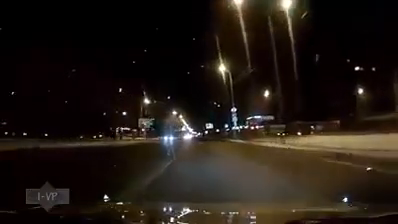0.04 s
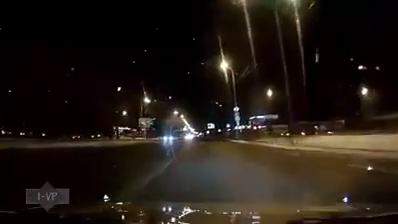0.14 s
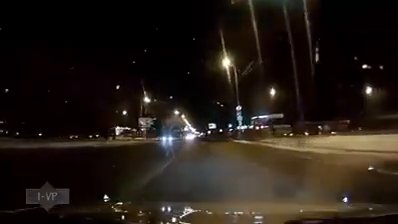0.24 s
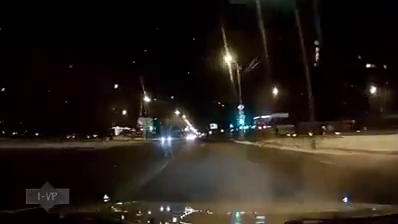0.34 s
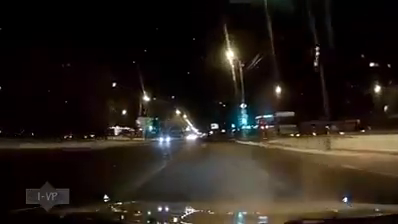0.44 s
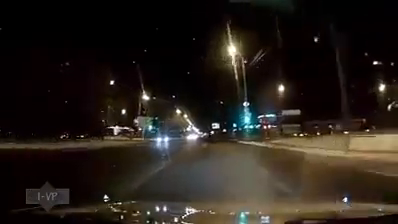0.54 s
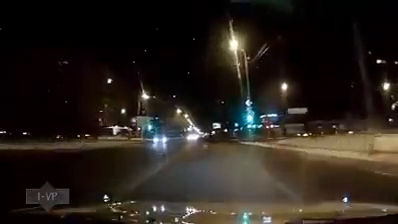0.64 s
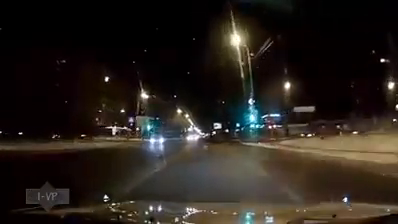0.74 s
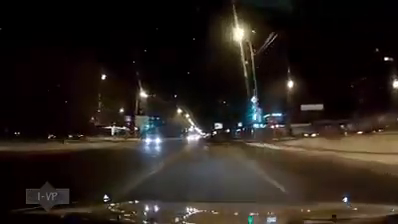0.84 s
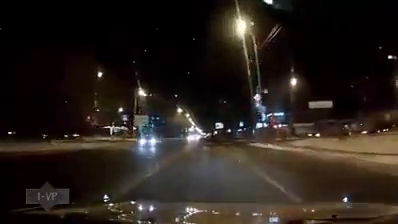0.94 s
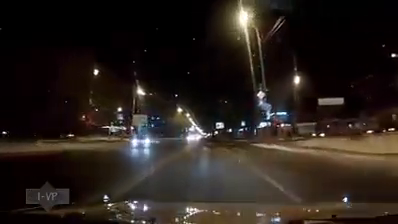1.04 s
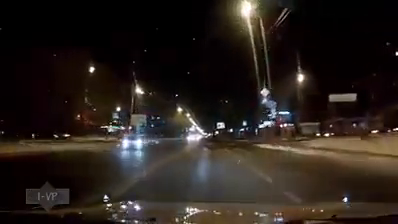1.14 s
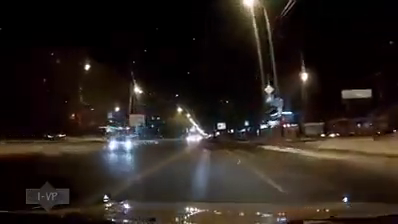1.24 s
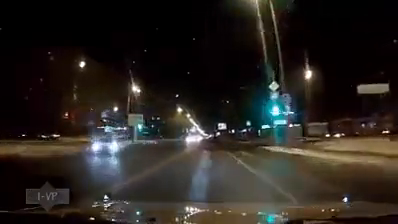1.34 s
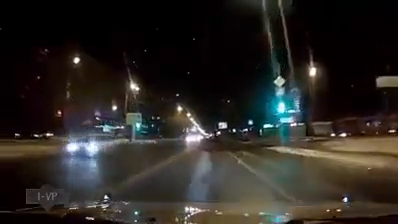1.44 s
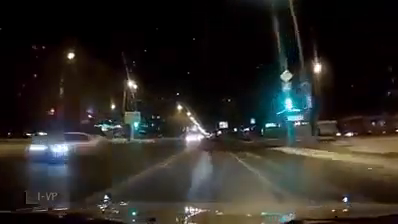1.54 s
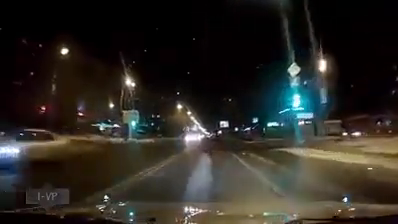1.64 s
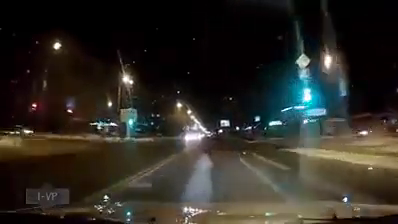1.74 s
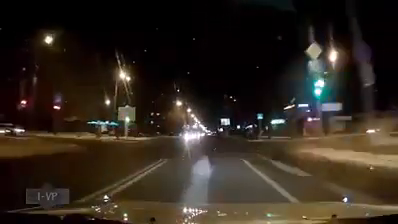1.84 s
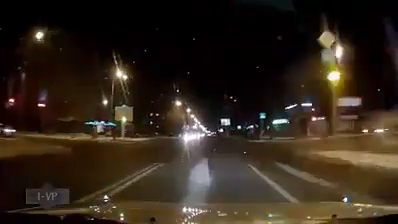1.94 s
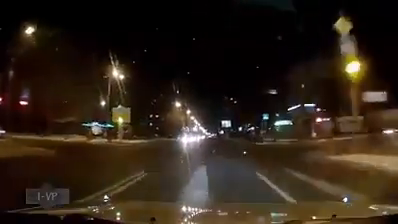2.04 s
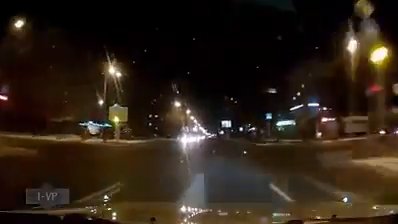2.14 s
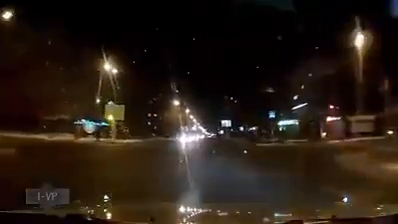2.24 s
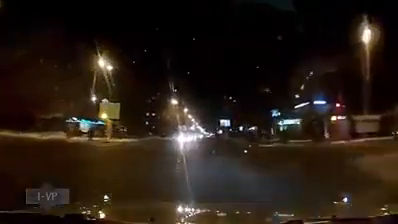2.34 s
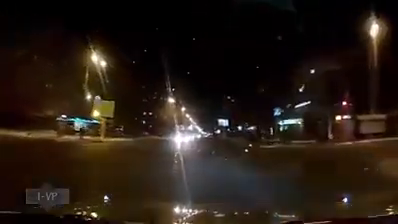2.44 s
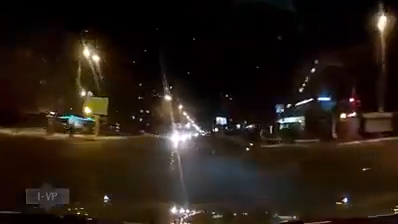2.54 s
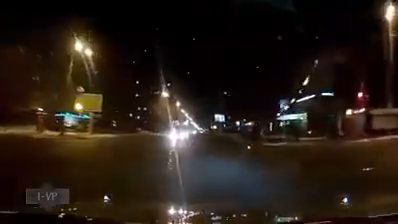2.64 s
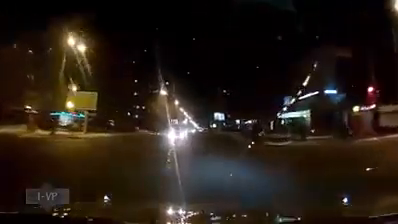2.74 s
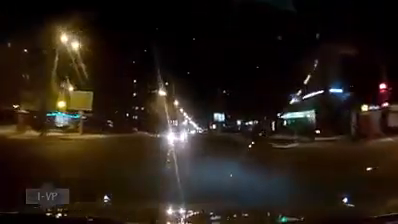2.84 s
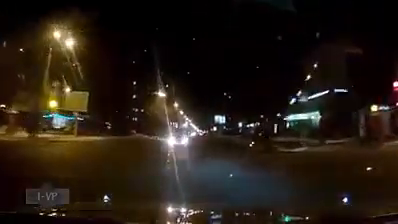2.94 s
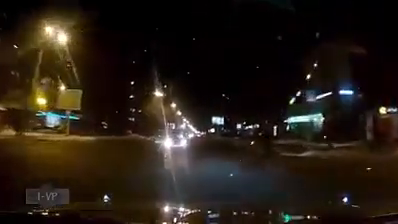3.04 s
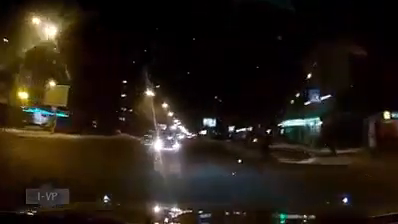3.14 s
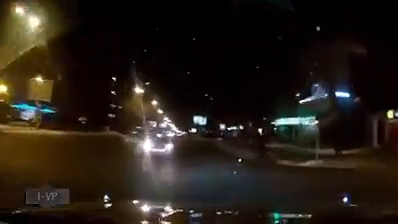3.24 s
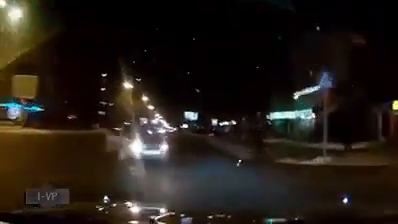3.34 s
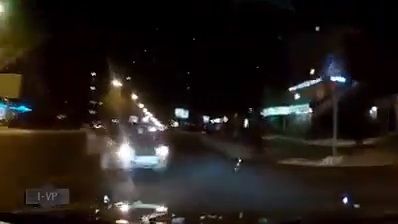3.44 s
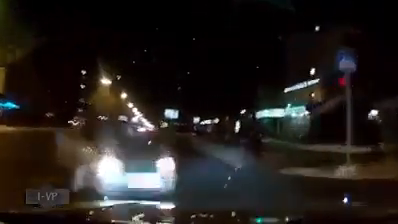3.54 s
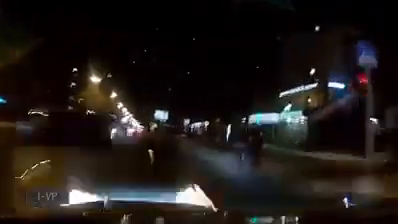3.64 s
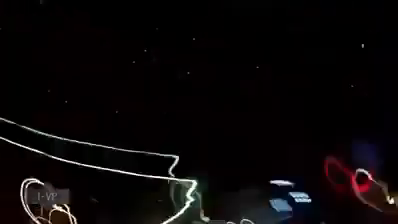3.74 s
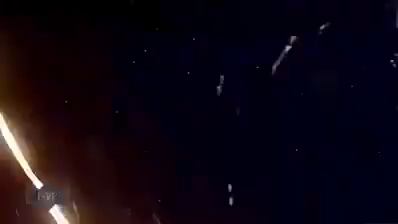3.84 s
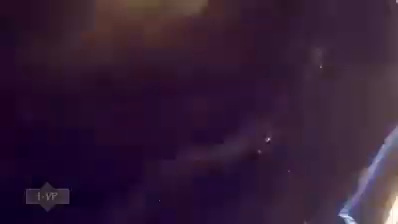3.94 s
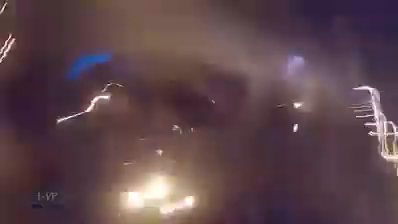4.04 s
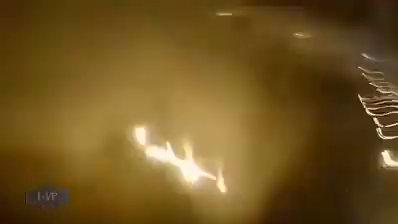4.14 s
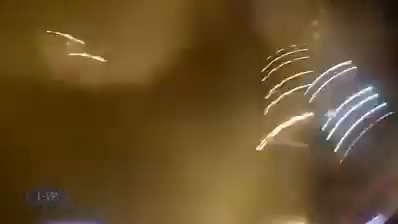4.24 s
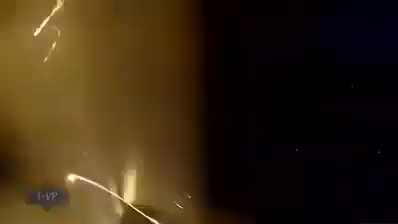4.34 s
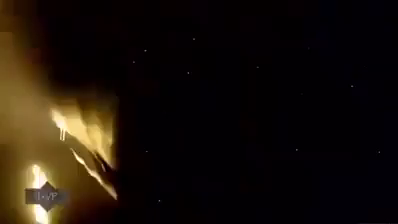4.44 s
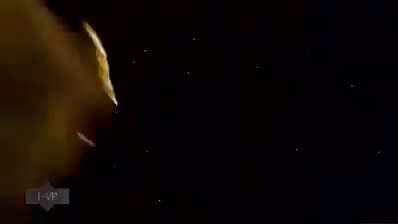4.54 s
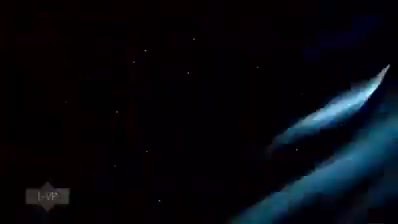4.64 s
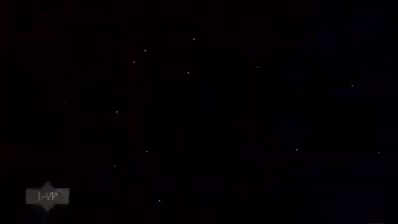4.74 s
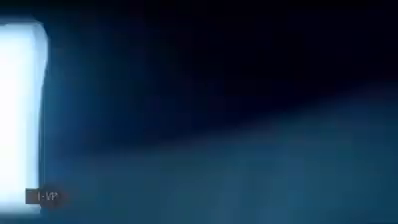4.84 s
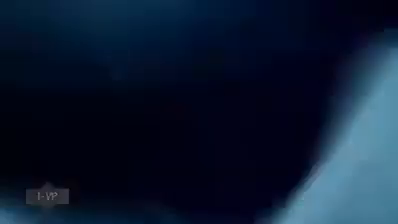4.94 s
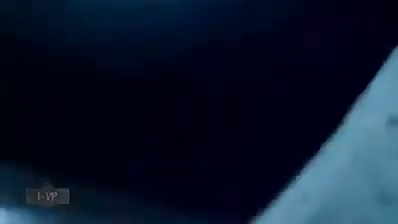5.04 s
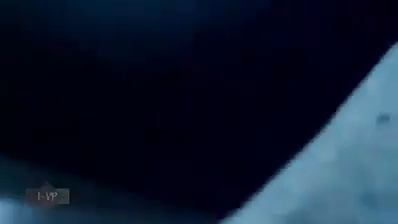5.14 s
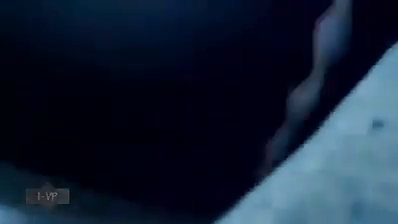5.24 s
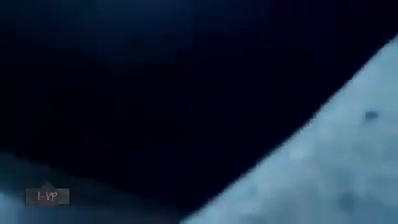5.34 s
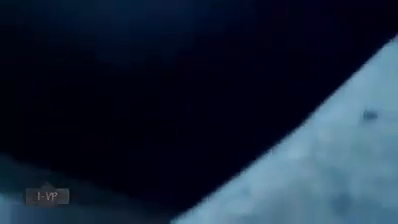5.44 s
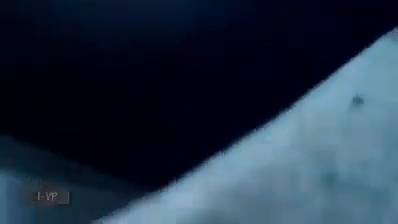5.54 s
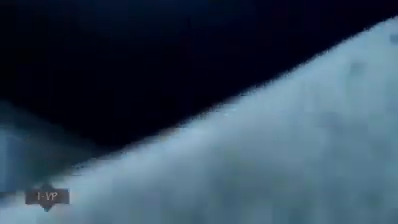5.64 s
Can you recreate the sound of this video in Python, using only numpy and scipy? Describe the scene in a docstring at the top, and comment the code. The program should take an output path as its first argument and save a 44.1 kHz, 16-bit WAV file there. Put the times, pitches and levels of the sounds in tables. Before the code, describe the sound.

Inside a car, a low road rumble and slushy swishes end in a loud collision with bangs, crumpling metal and scattered knocks.

```python
"""A low tyre roar comes first: a car rolls over a wet winter road, heard by a small camera on the
windscreen. The tyres swish twice in slush as it brakes, then it hits another car. Sheet metal crumples
in dense clicks, the camera falls and knocks about the cabin, the blows excite the resonances of trim
and panels, and the wreck hisses. The microphone saturates on the loudest swings."""
import sys
import numpy as np
from scipy import signal
from scipy.fft import rfft, irfft, next_fast_len
from scipy.io import wavfile
from scipy.ndimage import uniform_filter1d

SR = 44100
rng = np.random.default_rng(int(sys.argv[2]) if len(sys.argv) > 2 else 0)


def file_out(sig):
    """Save sig as 16-bit WAV at sys.argv[1]."""
    # one column per channel
    cols = np.atleast_2d(sig).T
    # limit, then scale
    lim = np.clip(cols, -1, 1)
    pcm = np.round(lim * 32767).astype(np.int16)
    wavfile.write(sys.argv[1], SR, pcm)


N = 250929


def blows():
    """Impact excitation: a brief rattle of contacts drives the modes of trim and sheet, and ticks."""
    # blows: (time [s], weight [dB], crack [dB], tick [dB], rattle length [s])
    impacts = [(3.7, -24, -67, -75, 0.005), (3.707, -8.5, -44, -50, 0.0058), (3.73, -17, -25.5, -40, 0.016),
               (3.749, -16, -24.5, -44, 0.014), (3.764, -26.5, -23.5, -34, 0.027),
               (3.781, -16.5, -38, -37, 0.009), (3.797, -41, -21.5, -23.5, 0.013),
               (3.819, -24, -23.5, -28, 0.013), (3.843, -36, -21.5, -22.5, 0.0065),
               (3.902, -9.5, -25, -30.5, 0.0042), (3.923, -19, -20, -36, 0.0036),
               (3.933, -8, -16.5, -26, 0.0086), (3.953, -14, -18, -26, 0.01), (3.99, -6, -21, -28, 0.0031),
               (4.02, -17.5, -23.5, -32, 0.014), (4.088, -30, -26.5, -41, 0.0025),
               (4.101, -16, -46, -56, 0.008), (4.176, -17, -31.5, -45, 0.012),
               (4.299, -38, -31.5, -43, 0.011), (4.392, -7, -27.5, -27, 0.0074),
               (4.469, -20.5, -62, -68, 0.0077), (4.496, -15, -24.5, -29.5, 0.015),
               (4.531, -28, -30, -56, 0.0056), (4.546, -17.5, -56, -69, 0.0062),
               (4.57, -17.5, -69, -67, 0.0057), (4.65, -49, -33.5, -34.5, 0.0068),
               (4.7767, -4, -17.5, -21, 0.0028), (4.785, -4.5, -26, -25.5, 0.005),
               (4.838, -29.5, -28.5, -39.5, 0.0036), (4.876, -28.5, -21.5, -43, 0.0018),
               (4.917, -32, -24.5, -49, 0.0046), (4.947, -35, -32, -43, 0.008),
               (5.051, -22.5, -29.5, -48, 0.0021), (5.397, -40, -34.5, -40, 0.0098),
               (5.428, -22.5, -39, -57, 0.005)]
    # modes of the struck trim: (frequency [Hz], bandwidth [Hz], gain [dB])
    trim = [(201, 208, -0.5), (342, 490, -1), (1144, 1060, 10.5), (2340, 1500, 2), (3100, 1050, -0.5)]
    # mode of a hollow panel: (frequency [Hz], bandwidth [Hz], gain [dB])
    hollow_panel = [(177.8, 18, 11.5)]
    # modes of the bent sheet metal: (frequency [Hz], bandwidth [Hz], gain [dB])
    sheet_modes = [(1273.5, 78, 0), (1457, 120, 1.5), (2122, 29, 4), (2627, 42, 0), (3630, 20, 1)]
    retune, scatter_db, knock_offset_db = 0.06, 3.5, -4
    contacts = undb(1.34 * walk(500)) * rng.standard_normal((4, N))
    chance = rng.standard_normal((len(impacts), 2, len(sheet_modes)))
    t = np.arange(int(.2 * SR)) / SR
    out = np.zeros(N)
    for (start, weight_db, crack_db, tick_db, length), (favour, bend) in zip(impacts, chance):
        # each blow lands elsewhere, retuning the sheet and favouring other modes
        sheet = [(hz * np.exp(retune * b), width, db + scatter_db * a)
                 for (hz, width, db), a, b in zip(sheet_modes, favour, bend)]
        settling = np.exp(-np.maximum(t - length, 0) / (0.96 * length))
        first_contact = 1 + 1.28 * np.exp(-t / 0.00082)  # the hardest of the rattle
        envelope = np.minimum(t / 0.00059, 1) * settling * first_contact
        span = slice(int(start * SR), int(start * SR) + len(t))
        force = envelope * contacts[:, span]
        thump = resonances(resonances(force[0], trim[:2]), trim[:2]) + resonances(force[0], hollow_panel)
        knock = resonances(resonances(force[1], trim[2:3]), trim[2:3])
        crack = resonances(resonances(force[2], trim[3:]), trim[3:]) + 5.2 * resonances(force[2], sheet)
        tick = band(force[3], 5200, 8240)
        knock_db = (weight_db + crack_db) / 2 + knock_offset_db
        for db, ring in (weight_db, thump), (knock_db, knock), (crack_db, crack), (tick_db, tick):
            out[span] += undb(db) * ring * np.sqrt(np.sum(envelope ** 2) / np.sum(ring ** 2))
    return out


def wreck():
    """Buckling and friction: metal and debris emit bursts of clicks; the lurching body thuds."""
    # spectrum of crumpling metal: (frequency [Hz], relative density [dB])
    crunch_spectrum = [(260, -13), (450, -1.5), (630, -5), (705, -10.5), (850, -1), (933, -5), (1010, -2.5),
                       (1560, -5.5), (1860, -15), (2080, -14), (2760, -10), (3550, -12.5), (4000, -32.5),
                       (5460, -37), (9240, -120)]
    # metal gives way: (start [s], hold [s], crunch [dB], splinter [dB])
    crushes = [(3.715, 0.045, -24, -41), (3.785, 0.079, -23.5, -32), (3.91, 0.13, -24.5, -35.5),
               (4.05, 0.24, -34.5, -45.5), (4.49, 0.037, -46, -43.5), (4.66, 0.32, -38.5, -48.5)]
    # the body lurches: (start [s], hold [s], jolt [dB], thud [dB])
    lurches = [(3.705, 0.06, -14.5, -22), (3.88, 0.15, -24.5, -21), (4.08, 0.095, -28, -26),
               (4.42, 0.07, -15.5, -24), (4.5, 0.064, -17.5, -38), (4.85, 0.021, -15, -27.5),
               (5.06, 0.0069, -26, -35.5), (5.30, 0.036, -34.5, -34), (5.53, 0.11, -28.5, -34)]
    slide = (crushes[0][0], N / SR, -36.5, -56)  # debris slides on from the first crush
    bursts = undb(1.8 * walk(70))
    crunch = coloured(grit(1500, scatter_db=3.0), crunch_spectrum, flicker_db=1.6, flicker_hz=30)
    splinter = unit(band(grit(2400, scatter_db=0.94), 3600, 7800))
    jolt = band_noise(42, 101.5)
    thud = band_noise(93, 348) * undb(3.74 * walk(24.935))
    crunch_gain, splinter_gain = surges(crushes + [slide], fade_db_s=103.5)
    jolt_gain, thud_gain = surges(lurches, fade_db_s=58.5)
    low = jolt_gain * jolt + thud_gain * thud
    return low + bursts * (crunch_gain * crunch + splinter_gain * splinter)


def heave():
    """Mass on a spring: the body heaves on its tyres with a very low, wavering tone."""
    # course of the heave: (time [s], frequency [Hz], level [dB])
    course = [(2.4, 27, -48), (2.52, 25, -25), (2.66, 30.4, -57), (2.82, 37.2, -16), (2.97, 32, -36),
              (3.11, 31.8, -27), (3.21, 33, -16), (3.43, 29, -15), (3.57, 36.8, -20.5), (3.68, 32.2, -31.5),
              (3.76, 29.94, -14), (3.82, 25.3, -29), (3.885, 26.2, -11), (3.98, 27.7, -30),
              (4.03, 27, -10.5), (4.27, 26.2, -26.5), (4.4, 31.6, -27), (4.65, 25.9, -8.5),
              (4.81, 27.5, -31), (4.87, 24, -12), (4.99, 23.7, -13), (5.08, 24.2, -20), (5.2, 19, -22.5),
              (5.69, 24, -33)]
    return tone(course, second_db=-13.5, rough_db=3.23, waver=0.161)


def panels():
    """Plate resonance: panels hum on in the crash, each with a drifting pitch."""
    # one course for each panel: (time [s], frequency [Hz], level [dB])
    courses = [
        [(4.16, 175.6, -32), (4.2, 165, -18.5), (4.25, 176.5, -22.5), (4.376, 196.7, -27), (4.4, 232, -10.5),
         (4.42, 217, -31)],
        [(4.79, 179, -24.5), (4.84, 195, -30.5), (4.91, 217.8, -24), (5.02, 200.8, -32)],
        [(5.29, 112.3, -28.5), (5.34, 110.9, -33.5), (5.518, 98.07, -29.5), (5.55, 99.2, -37)],
    ]
    return sum(tone(course, second_db=-13, rough_db=3.46, waver=0.05) for course in courses)


def pings():
    """Damped vibration: one thin mode of a small stiff metal part, struck again before it has died."""
    # strikes on the part: (time [s], level [dB])
    strikes = [(4.393, -50), (4.497, -50), (4.65, -60)]
    mode_hz, t60_s = 4310, 1
    t = np.arange(N) / SR
    envelope = sum((t >= start) * undb(db - 60 * np.abs(t - start) / t60_s) for start, db in strikes)
    return envelope * undb(2.5 * walk(19)) * np.sin(2 * np.pi * mode_hz * t)


def slush():
    """Random impacts sum to noise: slush swishes in the wheel arches, drums on the floor and sprays."""
    # patches of slush: (middle [s], length [s], swish [dB], drumming [dB], spray [dB])
    patches = [(2.82, 0.47, -42.5, -60, -71), (3.3, 0.2, -54, -32.5, -63), (3.466, 0.36, -47, -43, -84.5),
               (3.4, 1, -57.5, -48.5, -64.5)]
    # spectrum of the swish: (frequency [Hz], relative density [dB])
    swish_spectrum = [(260, -36), (450, -30.5), (543, -1), (593, -6.5), (848, -1.5), (1150, 3.5),
                      (1730, -13.5), (3090, -21), (3800, -38), (4940, -70), (8360, -120)]
    edge_db = 34  # fall from the middle of a patch to its ends
    swish = coloured(rng.standard_normal(N), swish_spectrum, flicker_db=1.2, flicker_hz=25)
    drum = band_noise(55, 270)
    spray = band_noise(2300, 3700)
    spray = undb(1.1 * walk(30)) * unit(spray + 0.33 * band_noise(3600, 8200))
    t = np.arange(N) / SR
    out = 0
    for middle, length, swish_db, drum_db, spray_db in patches:
        off_centre = np.abs(2 * (t - middle) / length)
        envelope = undb(-edge_db * np.minimum(off_centre ** 2.77, 10))
        out += envelope * (undb(swish_db) * swish + undb(drum_db) * drum + undb(spray_db) * spray)
    return out


def road():
    """Structure-borne sound: tyre roar and body boom reach the cabin through the floor."""
    # spectrum of the road noise: (frequency [Hz], relative density [dB])
    spectrum = [(11, -42), (19, 4), (33, 1), (48, -16), (102, -18), (170, -24), (230, -27.5), (334, -32),
                (359, -28.5), (422, -42.5), (453, -37), (811, -45.5), (1180, -44), (1600, -51.5),
                (2000, -58), (3300, -65), (5000, -86.5), (6500, -91), (9000, -99)]
    level_db = -28 + .7 * walk(3)
    return undb(level_db) * coloured(rng.standard_normal(N), spectrum, flicker_db=1.8, flicker_hz=12)


def rustles():
    """Amplitude-modulated noise: short, grainy treble scuffs over a faint flickering bed."""
    # rustles in the cabin: (start [s], hold [s], level [dB])
    scuffs = [(1.0, 0.13, -84), (2.585, .012, -74), (2.78, 0.088, -80), (3.083, .09, -73),
              (3.275, 0.035, -70), (3.46, .045, -66.5)]
    grain = unit(band(grit(900, scatter_db=2.5), 5600, 8300))
    bed = undb(-89.5 + 1.7 * walk(7.9))
    envelope = surges(scuffs, fade_db_s=248)[0] + bed
    return envelope * undb(1.8 * walk(60)) * grain


def tone(course, second_db, rough_db, waver):
    """Random modulation of pitch and level: a rough near-sine with a weak, broken second partial."""
    times, pitches, levels = np.transpose(course)
    t = np.arange(N) / SR
    hz, db = np.interp(t, times, pitches), np.interp(t, times, levels)
    gate = uniform_filter1d(1. * ((t >= times[0]) & (t <= times[-1])), size=300)
    phase = 2 * np.pi * np.cumsum(hz * np.exp(waver * walk(22))) / SR
    overtone = undb(second_db + 2 * rough_db * walk(60)) * np.sin(2 * phase)
    return gate * undb(db + rough_db * walk(55)) * np.sqrt(2) * (np.sin(phase) + overtone)


def surges(rows, fade_db_s, rise_s=0.015):
    """Incoherent addition: rows rise, hold and fade, and their powers sum to one gain a level column."""
    t = np.arange(N) / SR
    power = 0
    for start, hold, *levels_db in rows:
        envelope = np.clip((t - start) / rise_s, 0, 1) * undb(-fade_db_s * np.maximum(t - start - hold, 0))
        power += (undb(levels_db)[:, None] * envelope) ** 2
    return np.sqrt(power)


def coloured(x, spectrum, flicker_db, flicker_hz):
    """Spectral shaping: x takes on a spectrum in which each half-octave band flickers on its own."""
    hz, db = np.transpose(spectrum)
    size = next_fast_len(N)
    octaves = np.log2(np.maximum(np.fft.rfftfreq(size, 1 / SR), 1))
    shaped = rfft(x, size) * undb(np.interp(octaves, np.log2(hz), db, left=-120, right=-120))
    out = 0
    for centre in np.arange(np.log2(hz[0]) - .5, np.log2(hz[-1]) + 1, .5):
        share = np.clip(1 - np.abs(octaves - centre) * 2, 0, 1)
        out += undb(flicker_db * walk(flicker_hz)) * irfft(shaped * share, size)[:N]
    return unit(out)


def grit(clicks_per_s, scatter_db):
    """Shot noise: random clicks of unequal size over a bed of white noise."""
    arrivals = rng.random(N) < clicks_per_s / SR
    sizes = undb(scatter_db * rng.exponential(size=N)) * rng.standard_normal(N)
    return unit(arrivals * sizes) + 2.1 * rng.standard_normal(N)


def resonances(x, modes):
    """Modal superposition: x drives resonators in parallel."""
    return sum(undb(db) * signal.lfilter(*signal.iirpeak(hz, hz / width, SR), x) for hz, width, db in modes)


def walk(rate_hz):
    """Smoothed sample-and-hold noise with a spread near 1."""
    hold = int(SR / rate_hz)
    steps = np.repeat(rng.standard_normal(N // hold + 1), hold)
    return 1.197 * uniform_filter1d(uniform_filter1d(steps, hold), hold)[:N]


def band_noise(lo_hz, hi_hz):
    """Band-limited noise of unit RMS."""
    return unit(band(rng.standard_normal(N), lo_hz, hi_hz))


def band(x, lo_hz, hi_hz):
    """Band-pass filtering."""
    return signal.sosfilt(signal.butter(2, [lo_hz, hi_hz], "band", fs=SR, output="sos"), x)


def undb(db):
    """Decibels to amplitude ratio."""
    return 10 ** (np.asarray(db) / 20)


def unit(x):
    """Normalisation to unit RMS."""
    return x / np.sqrt(np.mean(x ** 2))


def scene():
    """Superposition: all sources add at one point in the cabin, alike in both channels."""
    mono = road() + heave() + slush() + wreck() + blows() + rustles() + pings() + panels()
    return np.array([mono, mono])


def record(dry):
    """Saturation: the microphone runs out of travel; fast ripples partly pass; the top is cut steeply."""
    overload, knee, top_hz = 0.39, 3.6, 8700
    limited = dry / (1 + np.abs(dry / overload) ** knee) ** (1 / knee)
    ripple = 0.57 * band(dry - limited, 1200, 12000)
    return signal.sosfilt(signal.ellip(10, .2, 70, top_hz, fs=SR, output="sos"), limited + ripple)


dry = scene()
out = record(dry)
file_out(out)
```